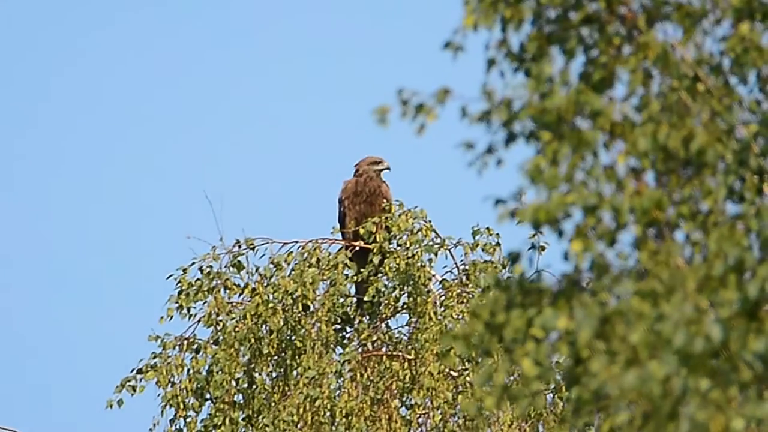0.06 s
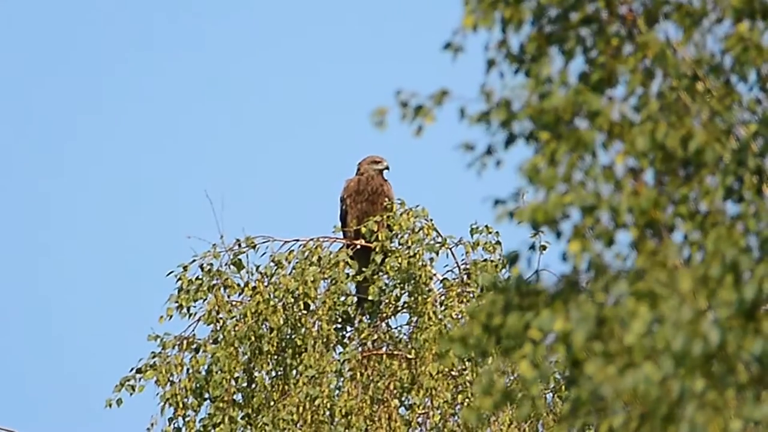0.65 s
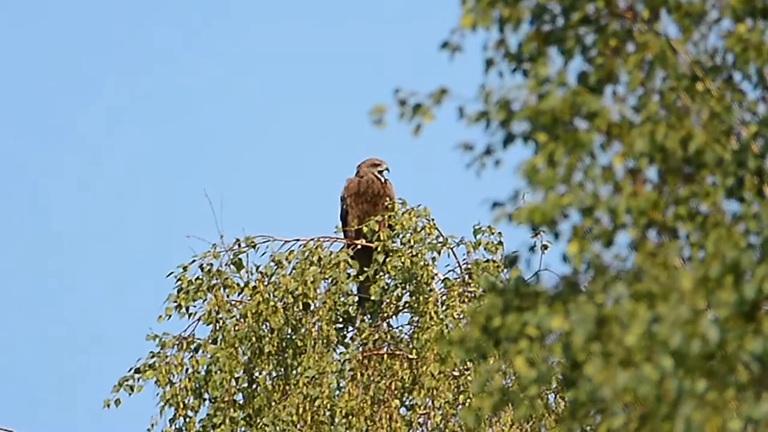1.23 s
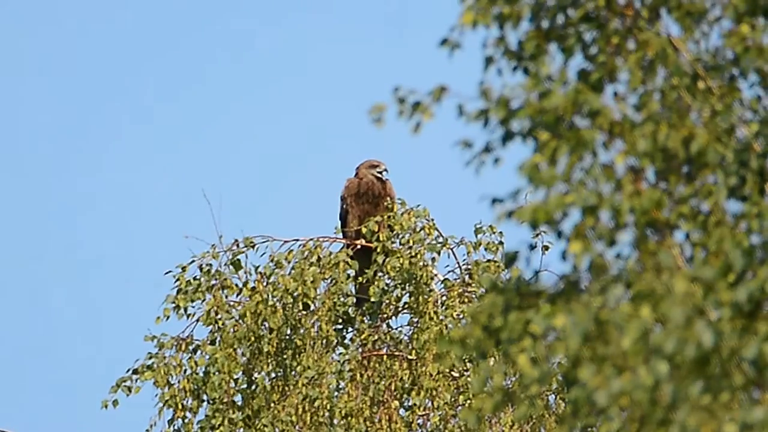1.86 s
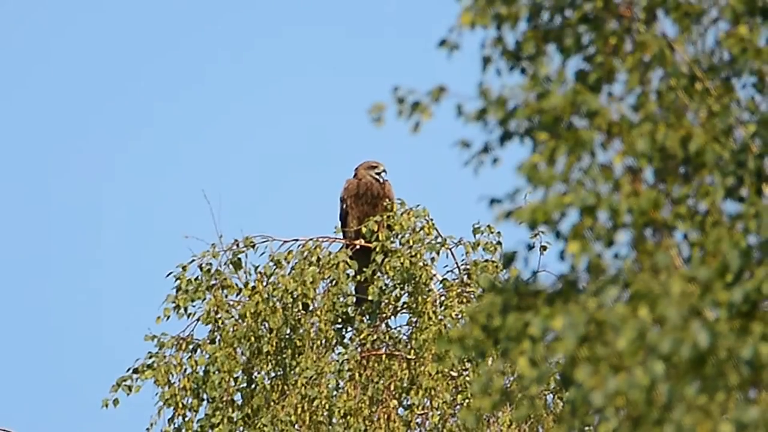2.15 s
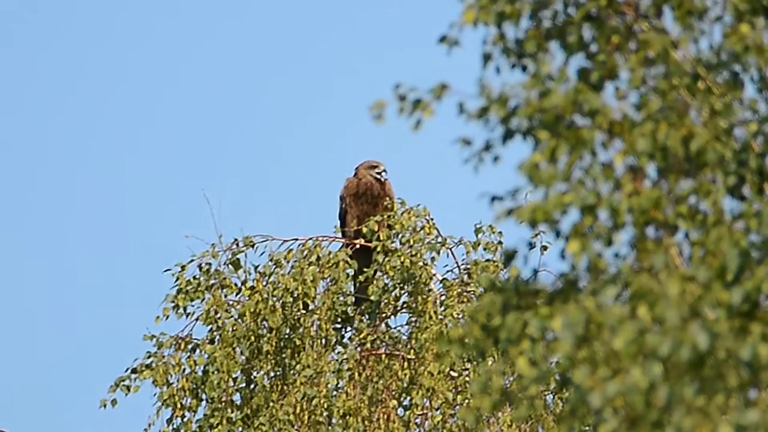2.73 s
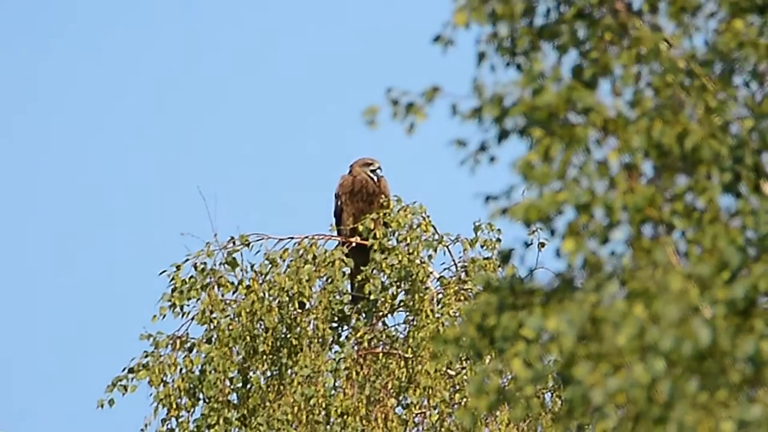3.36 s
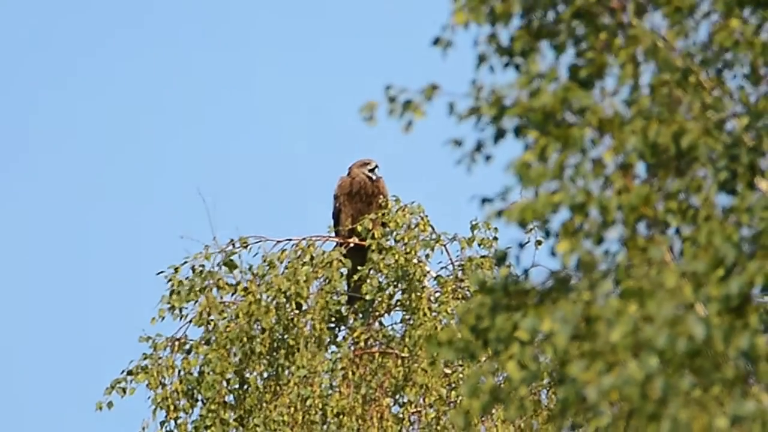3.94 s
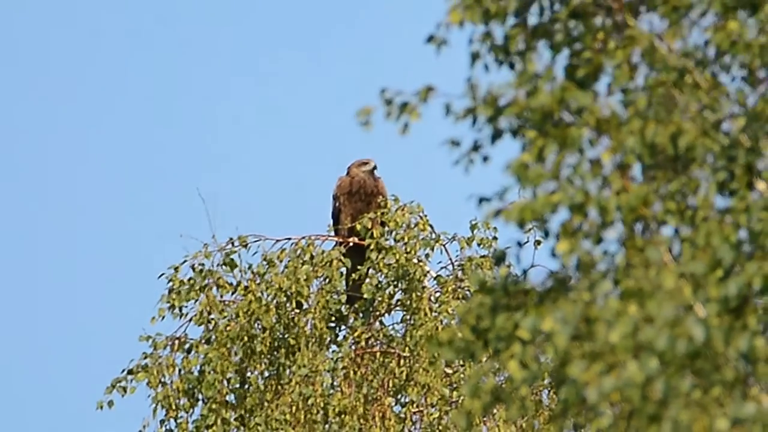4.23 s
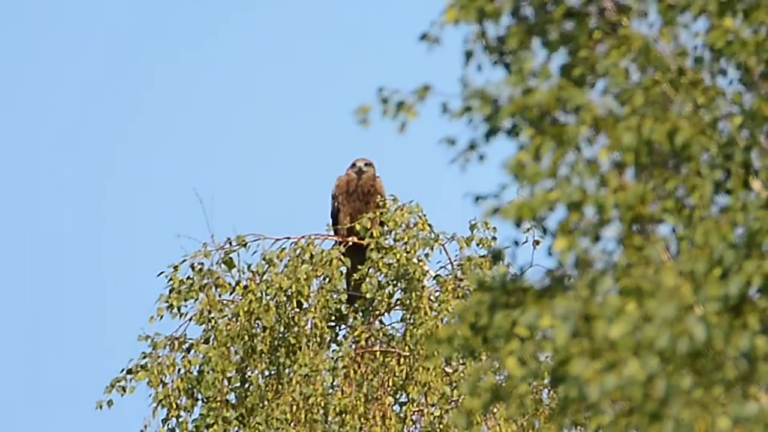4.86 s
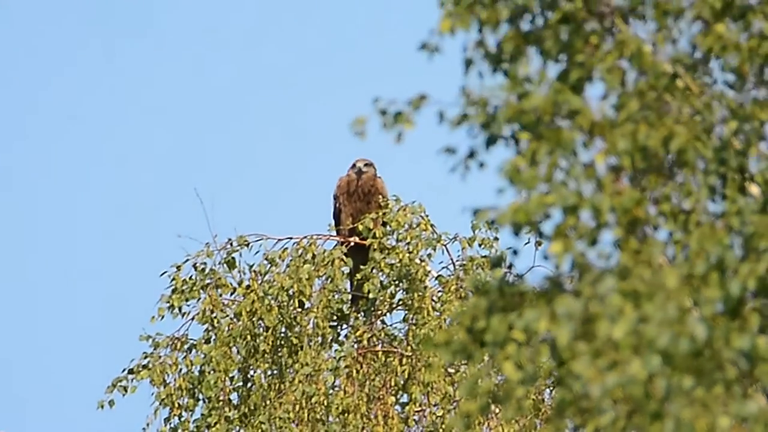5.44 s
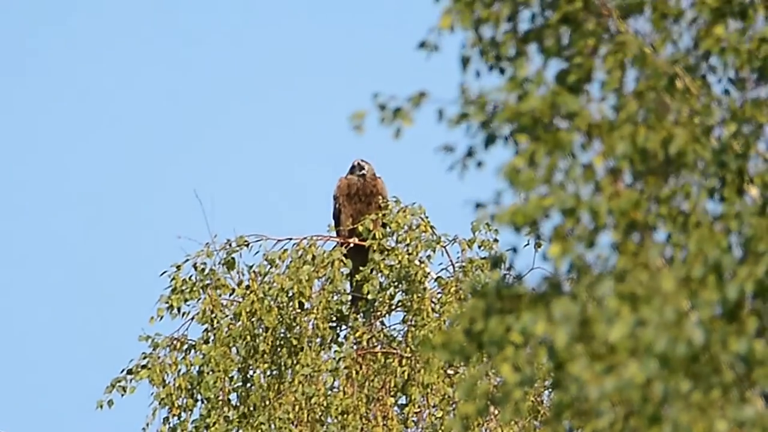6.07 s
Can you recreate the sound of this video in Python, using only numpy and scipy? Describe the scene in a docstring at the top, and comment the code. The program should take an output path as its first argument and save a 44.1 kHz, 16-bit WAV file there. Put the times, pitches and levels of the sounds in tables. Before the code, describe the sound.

Over a quiet open-air hush, a bird of prey whistles a high note and a string of short rising and falling ones. A louder run follows as wind starts to buffet the microphone, then a softer, more echoing run. The low gusts ease, return more strongly on the left, and the bird gives a single final call. A very faint high buzz lies underneath.

```python
"""A kite, a bird of prey, whistles from a birch: three runs of calls that rise and fall, then one last call.
Thin membranes in its voice box make the tone, and rasp as each call starts and ends. It turns its head
away for the third run. The treetops scatter every call into a faint echo. Gusts rumble and thump on the
two microphone openings, mostly the left, and a few tiny ticks sound midway. Under it all lie a distant
outdoor hush and a thin, high buzz from the camera."""
import sys
import numpy as np
from scipy import signal
from scipy.fft import rfft, irfft
from scipy.io import wavfile
from scipy.ndimage import uniform_filter1d

SR = 44100
rng = np.random.default_rng(int(sys.argv[2]) if len(sys.argv) > 2 else 0)


def bounce(signal):
    """Save signal as a 16-bit WAV file at the path given by the first command-line argument."""
    frames = np.transpose(np.atleast_2d(signal))
    limited = np.clip(frames, -1, 1)
    pcm = np.round(limited * 32767).astype(np.int16)
    wavfile.write(sys.argv[1], SR, pcm)


N = 273420
TIME = np.arange(N) / SR

# The bird's calls. Each row: start, length and time to the top pitch in seconds, top pitch and droop
# in Hz, then levels in dB of the tone, its octave, the rasp and the extra sound sent into the trees.
CALLS = [(1.24, .25, .053, 2950, 200, -49.5, -64.5, -70, -4.5),
         (1.635, .078, .029, 2852, 440, -50, -68, -61, -3),
         (1.785, .068, .027, 2920, 505, -50.5, -64.5, -67, -2),
         (1.951, .077, .028, 3016, 545, -49.5, -66, -62, -1),
         (2.124, .09, .035, 3094, 505, -47, -66, -66, 0), (2.58, .15, .046, 3198, 298, -43, -64, -58, -3),
         (2.853, .075, .028, 3020, 460, -43.5, -61.5, -57, -4.5),
         (3.01, .074, .027, 3060, 570, -47, -62, -59, -3),
         (3.18, .081, .031, 3138, 500, -48, -62.5, -60, 0),
         (3.628, .127, .042, 3238, 310, -54, -60.5, -68, 8.5),
         (3.897, .065, .026, 3035, 440, -56, -65.5, -72, 9),
         (4.056, .064, .024, 3053, 540, -53.5, -63.5, -70, 7.5),
         (4.245, .085, .036, 3156, 500, -51.5, -71, -64, 7),
         (6.005, .193, .049, 3120, 205, -48.5, -64.5, -63, 0)]


def undb(db):
    """Turn decibels into a number to multiply by."""
    return 10 ** (np.asarray(db) / 20)


def unit(x):
    """Scale a signal to an average strength (rms) of 1."""
    return x / np.sqrt(np.mean(x ** 2))


def shape(x, points):
    """Make some frequencies louder and others softer, along a curve of (Hz, dB) points."""
    hz, db = np.transpose(points)
    bins = np.maximum(np.fft.rfftfreq(N, 1 / SR), 1)
    curve_db = np.interp(np.log(bins), np.log(hz), db)
    return irfft(rfft(x) * undb(curve_db), N)


def band(x, hz, width_hz):
    """Keep the sound near one frequency, as a resonance does."""
    return signal.lfilter(*signal.iirpeak(hz, hz / width_hz, fs=SR), x)


def lowpass(x, hz):
    """Gently soften everything above one frequency."""
    return signal.sosfiltfilt(signal.butter(2, hz, fs=SR, output="sos"), x)


def wander(per_s):
    """A smooth random curve of typical size 1 that heads for a new value per_s times a second."""
    step = max(int(SR / per_s), 1)
    held = np.repeat(rng.standard_normal(N // step + 1), step)
    return unit(uniform_filter1d(uniform_filter1d(held, step), step)[:N])


def bump(at_s, half_width_s):
    """A bell-shaped swell of height 1."""
    return np.exp(-np.minimum(2 * ((TIME - at_s) / half_width_s) ** 2, 20))


def distant_hush(level_db=-54.5, swell_db=0.45):
    """Far-off air and leaves make a smooth noise, centred in the bass and wide in the treble."""
    # The tone of the hush. Each row: frequency in Hz, relative level in dB.
    colour = [(20, -25), (60, -11.5), (150, -7), (350, 1), (800, -0.5), (1500, -4.5), (2500, -10),
              (4000, -14), (6500, -19.5), (10000, -22), (15500, -21)]
    # Its stereo width. Each row: frequency in Hz, level of the side signal against the middle in dB.
    width = [(60, -46), (200, -12), (700, -6), (2400, -3.5), (15000, -2)]
    mid, side = (unit(shape(rng.standard_normal(N), colour)) for _ in range(2))
    side = shape(side, width)
    return undb(level_db + swell_db * wander(4.07)) * np.array([mid + side, mid - side])


def camera_buzz(level_db=-70.0, bursts_per_s=78.26, burst_s=0.00082, skirt_s=0.0027, skirt_db=-8,
                scatter_db=2.5, side_db=-7, lean_right_db=3.0):
    """The camera's electronics spit short bursts of high fizz at a steady rate, some stronger."""
    # The tone of the fizz. Each row: frequency in Hz, relative level in dB.
    colour = [(5000, -28), (8000, -13), (10000, -11.5), (11100, -4), (11700, -7), (12400, 3), (13300, -3),
              (14400, -16), (15000, -16), (15800, -18)]
    from_peak_s = abs((TIME * bursts_per_s + .5) % 1 - .5) / bursts_per_s
    bursts = np.exp(-from_peak_s / burst_s) + undb(skirt_db) * np.exp(-from_peak_s / skirt_s)
    bursts *= undb(scatter_db * wander(80))
    mid, side = (unit(shape(bursts * rng.standard_normal(N), colour)) for _ in range(2))
    side *= undb(side_db)
    lean = undb(lean_right_db)
    return undb(level_db) * np.array([(mid + side) / lean, (mid - side) * lean])


def kite_whistles(climb_hz=255, arch_s=.038, attack_s=.013, release_s=.01, hold_s=.125, tire_db_per_s=85,
                  jitter=.0055, flutter_db=(1.2, 3.2), third_db=-15, undertone_db=-28, breath_db=-23,
                  fade_db_per_hz=.016, octave_fade_db_per_hz=.010,
                  flip_s=(1.283, 1.33), flip_ratio=1.183, flip_db=1, flip_octave_db=-12):
    """Membranes in the voice box tighten and slacken, so a breathy, nearly pure tone rises and falls."""
    out = np.zeros(N)
    waver, flutter = 1 + jitter * wander(500), wander(200)
    breath = unit(band(rng.standard_normal(N), hz=3500, width_hz=1500))
    # In the first call the voice flips up to a higher note and back.
    flip = uniform_filter1d(1. * ((TIME > flip_s[0]) & (TIME < flip_s[1])), size=110)
    for start, length, rise, top_hz, droop_hz, tone_db, octave_db, _, _ in CALLS:
        fade_in = np.clip((TIME - start) / attack_s + .5, 0, 1)
        gate = fade_in * np.clip((start + length - TIME) / release_s + .5, 0, 1)
        on = gate > 0
        t = TIME[on] - start
        climbing_hz = climb_hz * np.log2(1 + (1 - t / rise) ** 2)
        sinking_hz = droop_hz * np.log1p(((t - rise) / arch_s) ** 2)
        below_top_hz = np.where(t < rise, climbing_hz, sinking_hz)
        pitch_hz = (top_hz - below_top_hz) * flip_ratio ** flip[on] * waver[on]
        phase = 2 * np.pi * np.cumsum(pitch_hz) / SR
        # Every second swing is slightly unlike the first, adding a faint tone at 1.5 times the pitch.
        tone = np.sin(phase) + undb(undertone_db) * np.sin(1.5 * phase) + undb(breath_db) * breath[on]
        overtones = np.sin(2 * phase) + undb(third_db) * np.sin(3 * phase)
        # The level follows the pitch, and a long call cannot be held at full strength.
        tired_db = tire_db_per_s * np.maximum(t - hold_s, 0)
        tone *= undb(tone_db - fade_db_per_hz * below_top_hz - tired_db + flip_db * flip[on])
        overtones *= undb(octave_db - octave_fade_db_per_hz * below_top_hz + flip_octave_db * flip[on])
        # The voice grows unsteady as the air pressure runs out.
        unsteady_db = np.interp(t, [0, length], flutter_db) * flutter[on]
        out[on] += np.sqrt(2) * gate[on] * undb(unsteady_db) * (tone + overtones)
    return out


def kite_rasps(flap_hz=1270, jitter=0.051, throat=(3600, 1300), grit_band=(1900, 1800), grit_db=-5,
               lead_s=.004, opening_s=.016, early_s=.008, closing_s=.022, closing_db=-2.8):
    """As a call starts and ends, the slack membranes flap unevenly at roughly half the pitch."""
    phase = 2 * np.pi * np.cumsum(flap_hz * (1 + jitter * wander(1200))) / SR
    flaps = sum(np.sin(k * phase) for k in range(1, 5))
    # The throat picks out the overtones. Both bands are given as centre and width in Hz.
    voiced = unit(band(band(flaps, *throat), *throat))
    grit = unit(band(band(rng.standard_normal(N), *grit_band), *grit_band))
    swell = np.zeros(N)
    for start, length, *_, rasp_db, _ in CALLS:
        opening = bump(start - lead_s, opening_s)
        closing = undb(closing_db) * bump(start + length - early_s, closing_s)
        swell += undb(rasp_db) * (opening + closing)
    return swell * (voiced + undb(grit_db) * grit)


def tree_echo(calls, near_db=-17, near_s=0.06, far_db=-13.6, tail_s=1.6, build_s=0.03,
              bounce_s=0.052, bounce_db=-18, side_db=-3):
    """Nearby twigs scatter the calls at once, the next treetop echoes softly, farther ones add a tail."""
    # What the treetops send back. Each row: frequency in Hz, boost or cut in dB.
    treetops = [(2000, -4), (2650, 3), (3050, 3.5), (3500, 8), (4300, -3), (6500, -2)]
    t = TIME[:SR]
    near = np.exp(-t / near_s)
    far = (1 - np.exp(-t / build_s)) * undb(-60 * t / tail_s)
    decay = np.hypot(undb(near_db) * unit(near), undb(far_db) * unit(far)) / np.sqrt(SR)
    end_fade = np.clip((TIME[-1] - TIME) / .01, 0, 1)
    returned = shape(calls * end_fade, treetops)
    mid, side = (signal.fftconvolve(returned, decay * rng.standard_normal(SR))[:N] for _ in range(2))
    mid += undb(bounce_db) * np.interp(TIME - bounce_s, TIME, returned, left=0)
    side *= undb(side_db)
    return np.array([mid + side, mid - side]) / np.sqrt(2)


def gust_levels(calm_db=-82, rise_s=.08):
    """How hard the wind presses on the left and right openings, in dB; the air starts out calm."""
    # Two spells of gusts. Each row: time in seconds, left level in dB, right level in dB.
    gusts = [(2.25, -69, -79), (2.45, -41, -53), (2.68, -44, -53), (2.75, -34, -46), (2.92, -48, -33),
             (2.98, -26, -43), (3.06, -27, -32), (3.14, -36, -40), (3.25, -32, -35), (3.29, -42, -45),
             (3.36, -33, -32), (3.44, -45, -44), (3.65, -47, -50), (3.9, -33, -49), (4.01, -49, -47),
             (4.14, -46, -63), (4.26, -45, -44), (4.34, -57, -67), (4.86, -70, -68), (4.9, -44, -51),
             (5.0, -60, -71), (5.05, -38, -50), (5.13, -47, -59), (5.2, -38, -39), (5.29, -25, -46),
             (5.36, -43, -48), (5.43, -33, -56), (5.48, -41, -32), (5.55, -28, -39), (5.68, -51, -47),
             (5.87, -20, -46), (6.19, -49, -55)]
    times, *sides = np.transpose(gusts)
    times = np.r_[times[0] - rise_s, times]
    return np.array([np.interp(TIME, times, np.r_[calm_db, side_db]) for side_db in sides])


def wind_rumble(gain_db=-2.0, bass_hz=95, treble_hz=240, brighten=0.28, thin_bass=1.1,
                medium_db=-34, smooth_s=0.0277, puff_db=2.7):
    """Air churns at each opening; stronger gusts shed smaller swirls and so sound brighter."""
    # The tone of a medium gust. Each row: frequency in Hz, relative level in dB.
    colour = [(20, -26), (40, -16.5), (70, -6), (120, 2), (190, -0.5), (280, -8.5), (400, -20.5),
              (600, -35.5), (1000, -52), (4000, -95)]
    out = []
    for side_db in gust_levels():
        gust_db = side_db + puff_db * wander(45)
        excess_db = np.maximum(gust_db - medium_db, -20)
        rumble = shape(rng.standard_normal(N), colour)
        bass, treble = lowpass(rumble, bass_hz), rumble - lowpass(rumble, treble_hz)
        rumble += (undb(-thin_bass * excess_db) - 1) * bass
        rumble += (undb(brighten * excess_db) - 1) * treble
        # Even out the noise so that the gust alone sets its loudness.
        strength = np.sqrt(uniform_filter1d(rumble ** 2, int(smooth_s * SR)))
        out.append(undb(gain_db + gust_db) * rumble / strength)
    return np.array(out)


def small_swirls(per_s=24, over_gust_db=5.0, scatter_db=2.0, middle_hz=220, scatter_octaves=.28):
    """List small swirls that cross either opening at random, stronger when the gust is stronger."""
    count = per_s * N // SR
    at, side = rng.integers(N, size=count), rng.integers(2, size=count)
    strength, pitch = rng.standard_normal((count, 2)).T
    db = gust_levels()[side, at] + over_gust_db + scatter_db * strength
    hz = middle_hz * 2 ** (scatter_octaves * pitch)
    return list(zip(at / SR, db, hz, side))


def wind_thumps(roundness=4.8, skew=0.75, reach_s=.04):
    """The core of a swirl of air sucks briefly at the opening it crosses: a steep dip in pressure."""
    # The strongest swirls. Each row: time in seconds, level in dB, pitch in Hz, side (0 left, 1 right).
    big_swirls = [(2.574, -25, 110, 0), (2.755, -23, 131, 0), (2.89, -21.5, 239, 1), (3.005, -12, 260, 0),
                  (3.051, -16.5, 248, 0), (3.094, -11.5, 300, 0), (3.102, -17, 282, 1),
                  (3.222, -21, 260, 1), (3.245, -16.5, 189, 0), (3.35, -18.5, 220, 0), (3.363, -19, 373, 1),
                  (3.423, -21.5, 219, 1), (3.781, -25, 180, 0), (3.897, -16.5, 247, 0),
                  (4.034, -28, 280, 1), (4.206, -26, 210, 0), (5.267, -18.5, 193, 0), (5.296, -18, 173, 0),
                  (5.443, -21, 234, 0), (5.498, -19.5, 230, 1), (5.53, -21.5, 250, 0), (5.857, -13, 240, 0),
                  (5.871, -11, 300, 0), (5.921, -14, 219, 0), (5.962, -20, 241, 0), (6.08, -24, 200, 0)]
    out = np.zeros((2, N))
    swirls = small_swirls() + list(big_swirls)
    for (at_s, db, hz, side), lean in zip(swirls, rng.standard_normal(len(swirls))):
        close = abs(TIME - at_s) < reach_s
        angle = 2 * np.pi * hz * (TIME[close] - at_s)
        pulse = 1 / (1 - 1j * angle / roundness) ** roundness  # a wave that fades fast on both sides
        lopsided = (pulse * np.exp(1j * skew * lean)).real
        out[int(round(side)), close] -= undb(db) * lopsided
    return out


def dry_ticks(decay_s=.0012, width_hz=650):
    """Tiny bursts of noise, each ringing very briefly at two pitches."""
    # The ticks. Each row: start in seconds, peak of each ring in dB, low and high pitch in Hz.
    ticks = [(3.194, -42.5, 1230, 5020), (3.195, -47, 2180, 3900), (3.210, -49, 5400, 6000)]
    out = np.zeros(N)
    for start, db, *pitches in ticks:
        decay = (TIME >= start) * np.exp(-np.minimum(abs(TIME - start) / decay_s, 20))
        burst = rng.standard_normal(N) * decay
        for hz in pitches:
            ring = band(band(burst, hz, width_hz), hz, width_hz)
            out += undb(db) * ring / np.max(abs(ring))
    return out


def scene():
    """The bird straight ahead, its echo all around, and wind right on the microphone."""
    calls = kite_whistles() + kite_rasps()
    # With its head turned away, the bird sends more of its voice into the trees.
    starts, *_, turned_db = np.transpose(CALLS)
    echo = tree_echo(calls * undb(np.interp(TIME, starts, turned_db)))
    return calls + dry_ticks() + echo + wind_rumble() + wind_thumps() + distant_hush() + camera_buzz()


def record(dry, top_hz=15700):
    """The camera steeply cuts off the highest treble."""
    treble_cut = signal.firwin(601, top_hz, fs=SR)
    return signal.fftconvolve(dry, treble_cut[None], mode="same", axes=1)


dry = scene()
out = record(dry)
bounce(out)
```